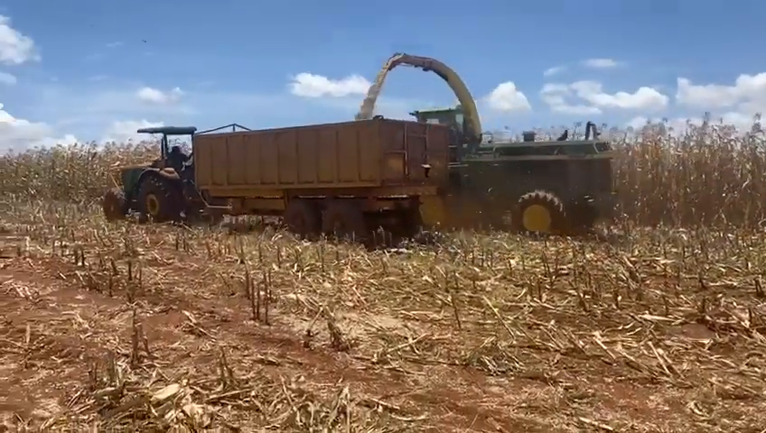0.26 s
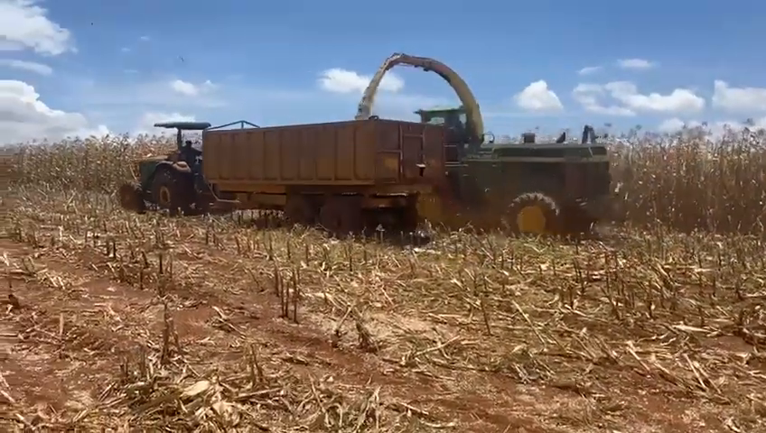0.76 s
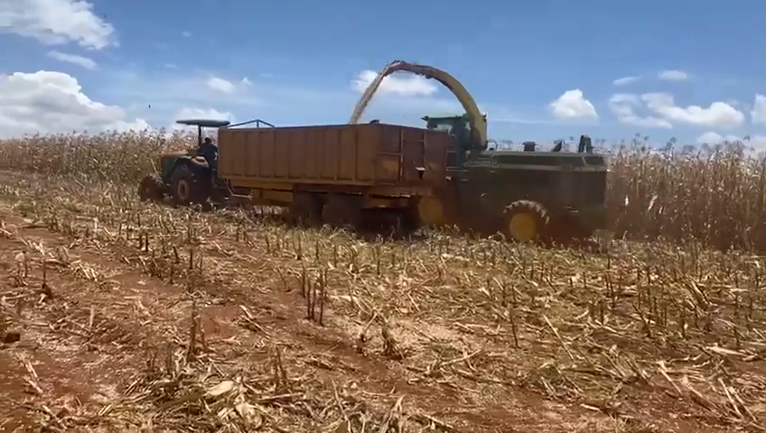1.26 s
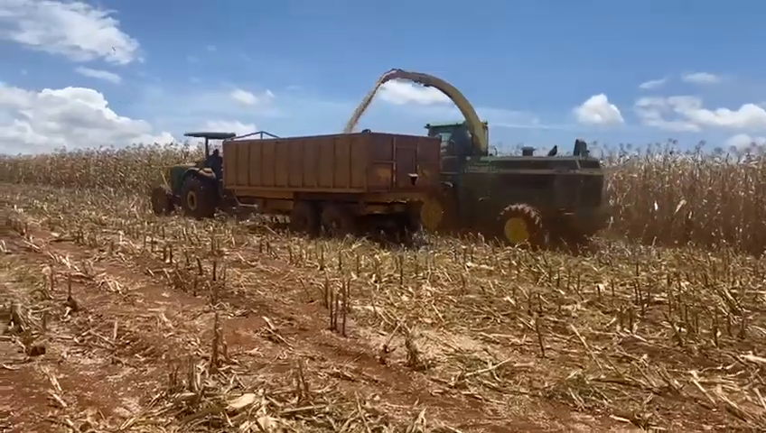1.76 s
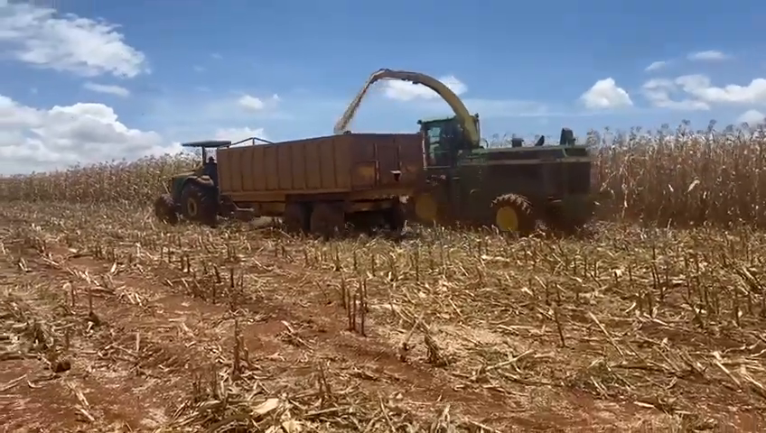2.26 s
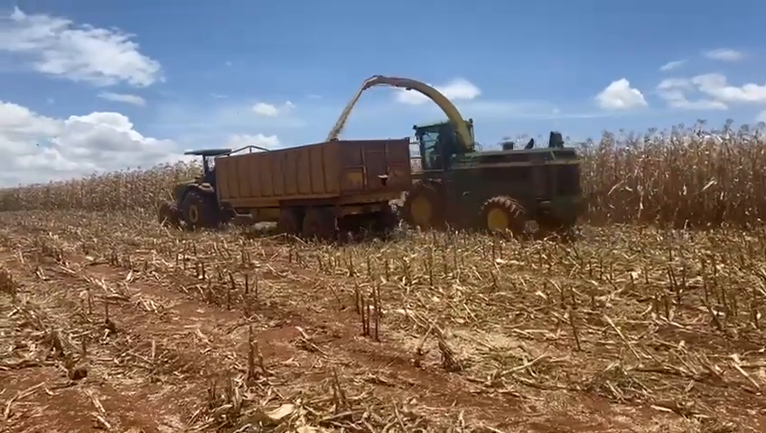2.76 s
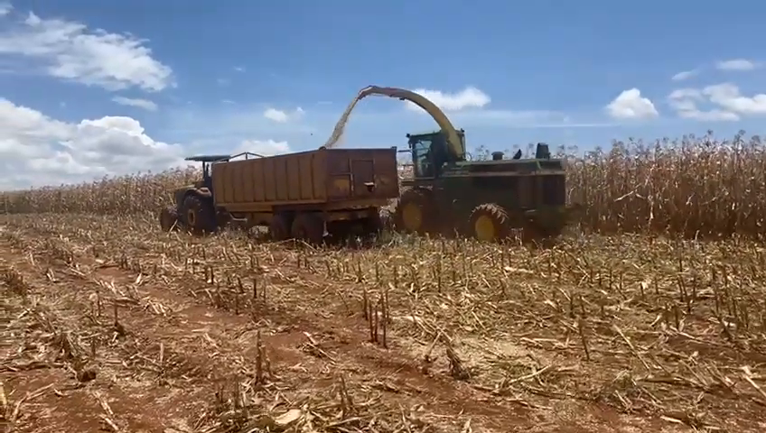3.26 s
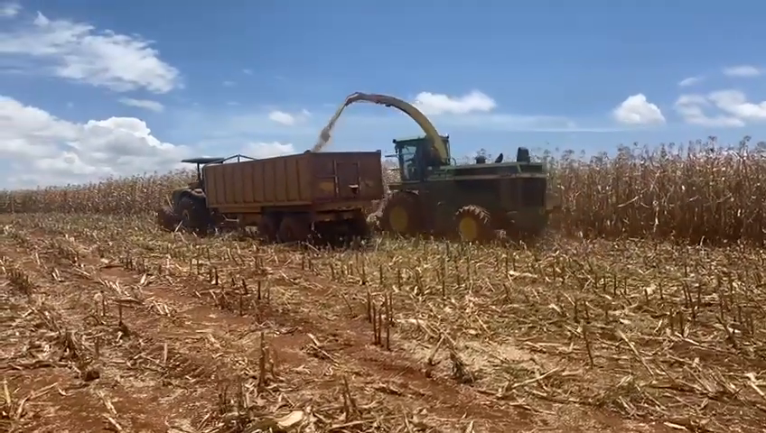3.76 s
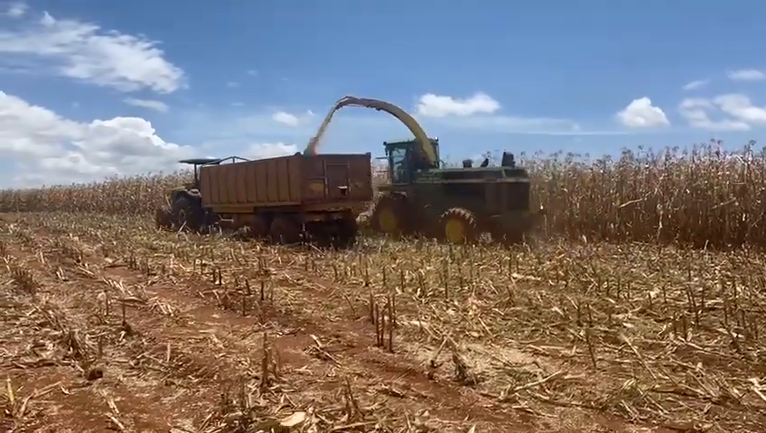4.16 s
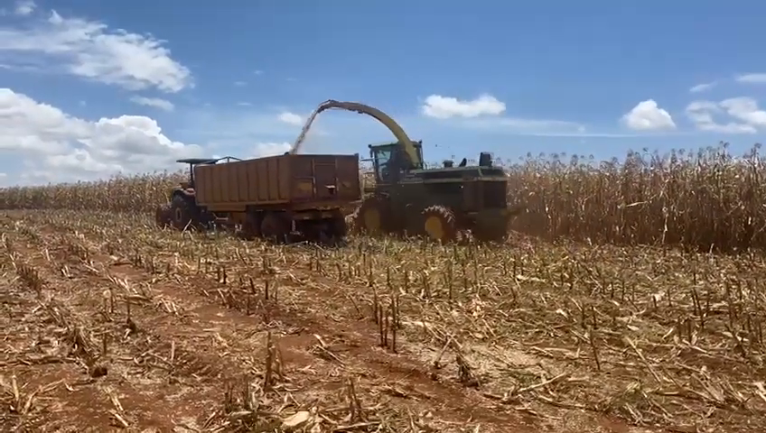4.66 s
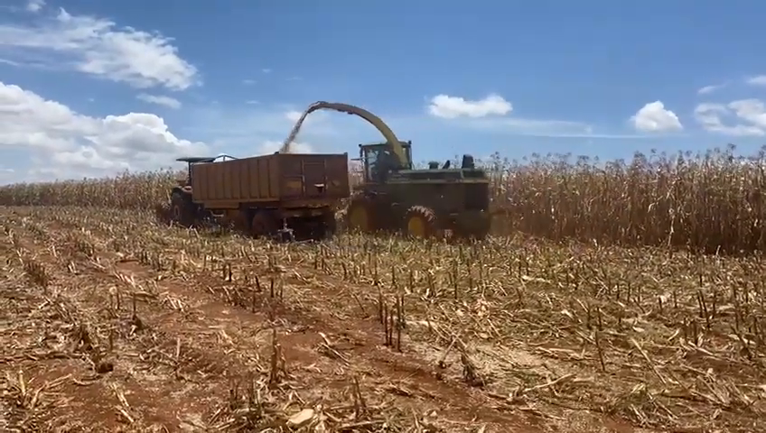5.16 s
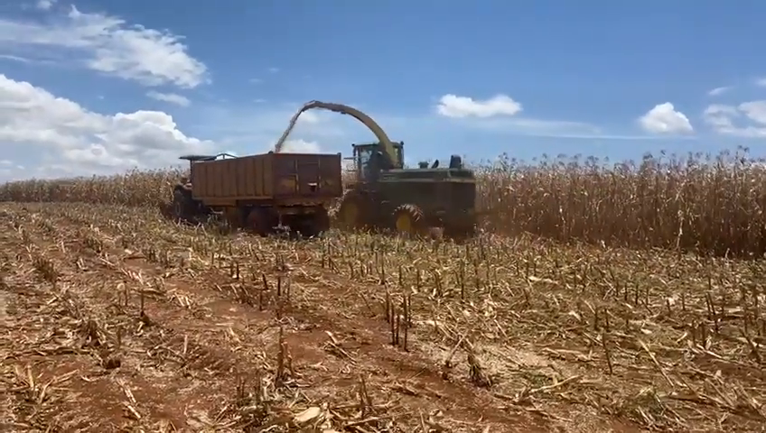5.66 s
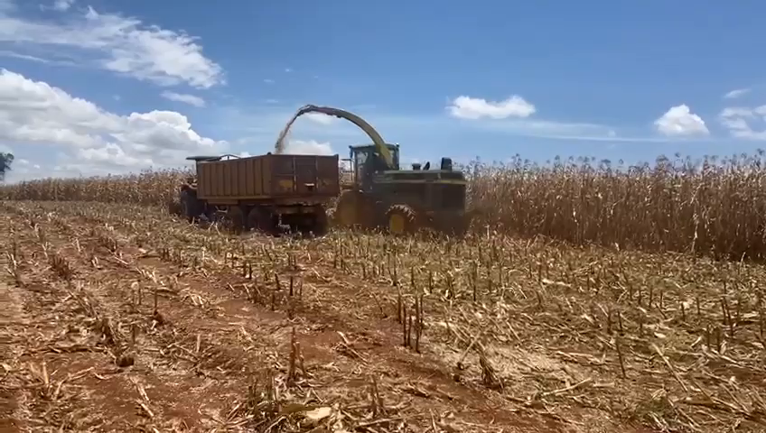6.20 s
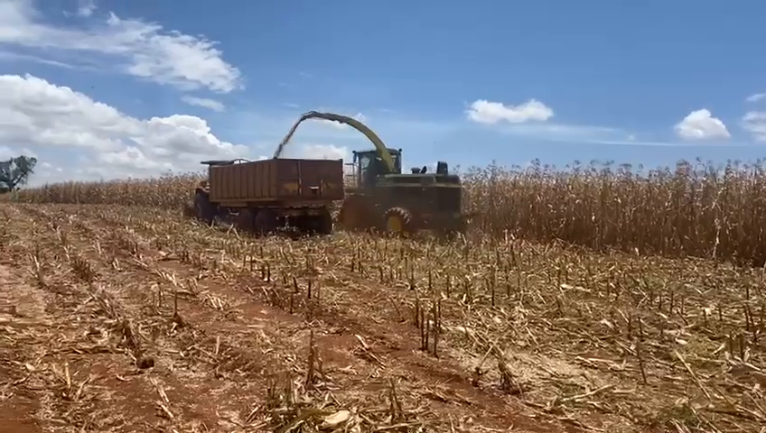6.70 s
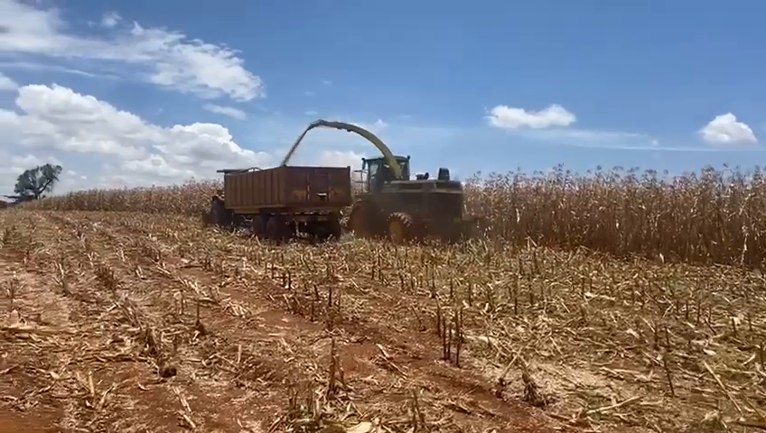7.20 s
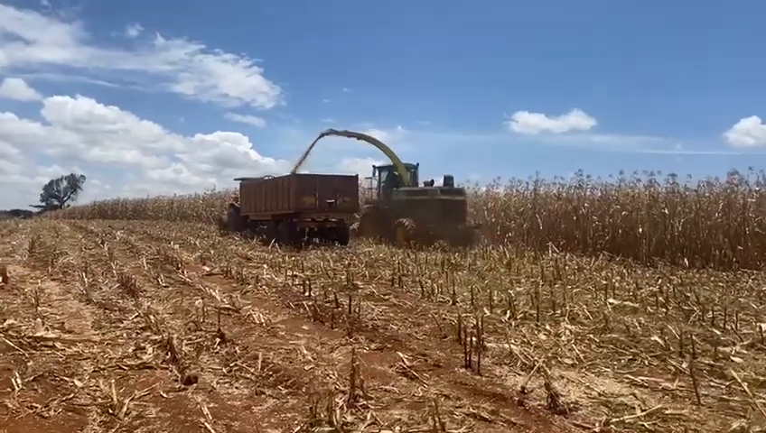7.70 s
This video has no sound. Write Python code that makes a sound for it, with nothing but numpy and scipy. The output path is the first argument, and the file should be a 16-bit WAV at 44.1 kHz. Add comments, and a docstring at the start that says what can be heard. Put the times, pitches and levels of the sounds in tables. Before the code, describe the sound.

A harvester and tractor drone loudly and evenly in an open field, with rattling machinery and chopped maize rushing through a metal spout.

```python
"""Forage harvester in a field

A harvester chops maize beside a tractor and trailer, moving slowly away. Periodic sources give tones:
the six-cylinder diesel drones, the cutterhead sings, the belt drives hum. Random impacts give noise:
chopped crop rushes up the spout in throbs and surges and excites the modes of its sheet steel.
A hand-held phone hears the scene, with a ground echo of crop and clatter and a few puffs of wind."""
import sys
import numpy as np
from scipy import signal
from scipy.fft import rfft, irfft
from scipy.io import wavfile

SR = 44100
rng = np.random.default_rng(int(sys.argv[2]) if len(sys.argv) > 2 else 0)


def int16_out(signal):
    """Quantize to a 16-bit WAV file."""
    q = np.round(np.clip(np.atleast_2d(signal).T, -1, 1) * 32767)
    wavfile.write(sys.argv[1], SR, q.astype(np.int16))


N = 350154
TIME = np.arange(N) / SR
BIN_HZ = np.arange(N // 2 + 1) * SR / N
TURN_S, TURN_TIME_S = 1.27, 0.95  # swing from side-on to tail-on: midpoint, time constant


def diesel(cycles):
    """Harmonic series: six firings a cycle, with unequal cylinders filling in the other orders."""
    # engine harmonics (multiple of the engine cycle, rms level [dB])
    harmonics = [(2, -46), (3, -42), (4, -46), (6, -35.5), (7, -40), (9, -31.5), (10, -34), (13, -33),
                 (14, -41), (15, -41), (16, -34.5), (18, -48), (22, -45), (24, -48), (25, -44), (26, -47),
                 (27, -47), (28, -50), (29, -47)]
    drone = sum(undb(db) * tone(cycles, order, flutter_db=1.1, wobble_rad=0.45)
                for order, db in harmonics)
    # the exhaust booms at twice the firing rate; it comes round to face the phone and fades once
    boom_db = -32.5 + 5.3 * turned(4.4, 0.3) - 13 * swell(3.34, 0.45)
    return drone + undb(boom_db) * tone(cycles, order=12, flutter_db=1.43, wobble_rad=0.086)


def cutterhead(cycles):
    """Blade-passing tone: knives cross the shear bar; the tone dwindles as the machine draws away."""
    # the octave beams toward the phone (time [s], half-width [s], rise [dB])
    beams = [(1.35, 1, 12), (7.9, 1, 12.5)]
    knife_db = -27 + interference(loudest_s=0.8, period_s=4.25, reflection=0.38) - 9 * swell(8.1, 1.04)
    octave_db = -45.5 + sum(db * swell(s, width) for s, width, db in beams)
    knife = undb(knife_db) * tone(cycles, order=17.5, flutter_db=1.0, wobble_rad=0.051)
    octave = undb(octave_db) * tone(cycles, order=35, flutter_db=2.5, wobble_rad=0.3)
    return knife + octave


def drives(cycles):
    """Non-integer drive ratios: shafts and belts hum between the engine's harmonics."""
    # geared and belted shafts (multiple of the engine cycle, relative level [dB])
    shaft_orders = [(3.28, -36), (4.37, -41.5), (6.56, -46), (6.83, -38), (9.56, -34.5), (10.93, -41.5),
                    (19.12, -41.5), (28.7, -41.5), (47.9, -47), (52.5, -48)]
    shafts = sum(undb(db + 0.7) * tone(cycles, order, flutter_db=3.5, wobble_rad=0.65)
                 for order, db in shaft_orders)
    belt_db = -36.5 + interference(loudest_s=0.96, period_s=12.3, reflection=0.92)
    return shafts + undb(belt_db) * tone(cycles, order=20.52, flutter_db=1.5, wobble_rad=0.23)


def exhaust_rumble():
    """Low-frequency noise: the exhaust rumbles at a steady level."""
    # rumble spectrum (frequency [Hz], relative density [dB])
    spectrum = [(15, -26), (28, -17), (42, -10), (60, -4), (95, 4.5), (140, 3), (200, -4.5), (300, -15),
                (600, -39)]
    return undb(-29.5) * coloured(gain_curve(spectrum))


def fan_roar(cycle_hz, firings, surge_db):
    """Load-dependent noise: fans and panels roar louder as the engine labours and slows."""
    # roar spectrum (frequency [Hz], relative density [dB])
    spectrum = [(100, -9), (190, -4), (270, 2.5), (350, 0), (420, -0.5), (520, -6.5), (640, -13.5),
                (900, -13), (2000, -69)]
    light_load_hz, db_per_sag_hz = 18.4, 8
    effort_db = db_per_sag_hz * (light_load_hz - cycle_hz) + surge_db
    level_db = -24.5 - 5 * turned(TURN_S, TURN_TIME_S) + effort_db
    return undb(level_db) * coloured(gain_curve(spectrum)) * (1 + 0.067 * firings)


def clatter(cycles, firings, feed_db):
    """Amplitude modulation: the machinery's impacts pulse with each firing and each engine cycle."""
    # clatter spectrum (frequency [Hz], relative density [dB])
    spectrum = [(350, -4), (600, 2), (800, 0), (1000, 0), (1250, -1.5), (1500, -8), (1720, -10.5),
                (1950, -8.5), (2500, -14.5), (3300, -37), (6000, -60)]
    level_db = -29 + 2.5 * turned(TURN_S, TURN_TIME_S) + feed_db
    pulsing = 1 + 0.03 * firings + 0.073 * throb(cycles, sharpness=2.1)
    return undb(level_db) * coloured(gain_curve(spectrum), scatter_db=1.5) * pulsing


def crop_stream(cycles, crunch_gain, chaff_db, thin_db):
    """Superposed impacts: chopped maize pelts the spout in throbs and hisses into the trailer."""
    # spectra of rushing crop, chaff and dry stalks (frequency [Hz], relative density [dB])
    rush_spectrum = [(1200, -7), (2000, -6), (2900, 2), (3400, -2), (3900, 1.5), (4500, -2.5), (5300, -5.5),
                     (6500, -11), (9000, -36)]
    hiss_spectrum = [(3500, -22), (5000, -7), (6200, -1), (7300, 0), (8100, -1.5), (9000, -2), (9700, -5),
                     (10200, -10), (11300, -10), (12000, -15)]
    crunch_spectrum = [(700, -14), (1300, -5), (2200, 10), (2700, 0), (3300, 4), (4200, 4.5), (5200, 4),
                       (6700, 3.5), (7600, -1), (9000, -18), (12000, -8)]
    turn = turned(TURN_S, TURN_TIME_S)
    flow_db = thin_db + 0.55 * walk(6)
    rush_db = -36 + 1.2 * turn + flow_db
    hiss_db = -39 - 1.16 * turn + flow_db + chaff_db + 1.2 * walk(11)
    rush = undb(rush_db) * coloured(gain_curve(rush_spectrum), scatter_db=2.0)
    hiss = undb(hiss_db) * coloured(gain_curve(hiss_spectrum), scatter_db=2.6)
    crunch = crunch_gain * coloured(gain_curve(crunch_spectrum), scatter_db=4.0)
    lumps = undb(0.55 * walk(14))
    pulsing = 1 + 0.078 * throb(cycles, sharpness=0.96) + 0.043 * throb(3 * cycles, sharpness=1)
    return (rush + hiss + crunch) * lumps * pulsing


def uneven_feed():
    """Slow modulation: thick bunches crunch and shift the noise levels; thin places lower them."""
    # bunches of dry stalks (time [s], half-width [s], crunch level [dB],
    # roar change [dB], clatter change [dB], chaff hiss change [dB])
    bunches = [(1.35, .18, -50, 2, 0, -0.5), (1.688, 0.066, -36, -1, 1.5, 4.5),
               (2.082, 0.15, -42, 0, 1.5, 2.5), (2.65, 0.13, -37.5, 4, 1.3, 3.5),
               (4.482, 0.1, -42, 4, 1, 2.5), (5.018, .11, -37.5, 1, 0.5, 1.5),
               (5.57, 0.033, -35, -3, 1.5, 3), (5.8, 0.08, -58, -1, 2, -2),
               (6.678, 0.074, -30.5, 2.5, 2, 0), (6.755, 0.052, -30.5, 0.5, 0.5, 3),
               (6.897, 0.12, -33.5, 0.5, 2, -1), (7.085, 0.052, -30, -6, 1, 0),
               (7.23, 0.075, -32.5, -1, 0.5, -4), (7.66, 0.25, -33.5, -3.5, 0.2, -3)]
    # thin places in the row (time [s], half-width [s], level change [dB])
    gaps = [(1.859, 0.094, -1), (3.303, .2, -0.5), (3.946, 0.56, -1), (6.3, 0.15, -0.6)]
    crunch_gain = sum(undb(db) * swell(s, width) for s, width, db, *_ in bunches)
    surge_db, knock_db, chaff_db = sum(np.outer(changes_db, swell(s, width))
                                       for s, width, _, *changes_db in bunches)
    thin_db = sum(db * swell(s, width) for s, width, db in gaps)
    return crunch_gain, surge_db, knock_db, chaff_db, thin_db


def sheet_metal(cycles):
    """Directional radiation: the spout and each panel ring loudest while they face the phone."""
    # panel modes (frequency [Hz], half-width [Hz], level [dB], facing time [s], half-width [s])
    modes = [(1670, 1000, -34, 0.26, 1), (2460, 67, -39, 1.3, 0.55), (3800, 130, -51, 1, 0.3),
             (2680, 32, -42.5, 2.8, 1), (1093, 60, -32, 2.8, 0.4), (3580, 300, -39.5, 5.42, 0.95),
             (2000, 140, -43.5, 7.2, 0.69), (490, 64, -27.5, 7.07, 0.73), (2288, 47, -32.5, 1.68, 0.16),
             (2237, 56, -36.5, 3.45, 0.34)]
    spout = undb(-39) * swell(2.7, 3.2) * resonance(centre_hz=2266, half_width_hz=71)
    panels = sum(undb(db) * swell(s, width_s) * resonance(hz, width_hz)
                 for hz, width_hz, db, s, width_s in modes)
    return panels + spout * (1 + 0.18 * throb(cycles, sharpness=0.96))


def resonance(centre_hz, half_width_hz):
    """Forced vibration: a stream of impacts keeps one sheet-metal mode ringing."""
    return coloured(1 / (1 + ((BIN_HZ - centre_hz) / half_width_hz) ** 2))


def hollow_steel(x, t60_s=0.057, share=0.3):
    """Reverberation: spout and trailer box ring briefly; the prominent modes shift as they move."""
    t = np.arange(SR // 5) / SR
    responses = rng.standard_normal((2, len(t))) * np.exp(-np.log(1000) * t / t60_s)
    one, other = (signal.fftconvolve(x, r[None] / np.linalg.norm(r), axes=1)[:, :N] for r in responses)
    angle = 1.7 * TIME
    ringing = np.cos(angle) * one + np.sin(angle) * other
    return (x + share * ringing) / np.hypot(1, share)


def ground_echo(x):
    """Comb filtering: the soil returns a later, duller copy, and the notches move with the phone."""
    # ground reflection (time [s], lag [ms], amplitude relative to the direct sound)
    reflection = [(0, 0.66, 0.2), (.5, 0.55, 0.26), (1, 0.52, 0.17), (1.3, 0.57, 0.17), (1.7, 0.61, 0.091),
                  (4, 0.64, 0.15), (7.9, 0.57, 0.13)]
    lag_ms, share = curves(reflection)
    dulled = irfft(rfft(x) * gain_curve([(3300, 0), (5000, -6), (9000, -18)]), N)
    echo = np.array([np.interp(TIME - lag_ms / 1000, TIME, channel) for channel in dulled])
    return (x + share * echo) / np.hypot(1, share)


def wind():
    """Turbulent pressure: short puffs buffet the microphone."""
    # puffs (time [s], half-width [s], relative level [dB])
    puffs = [(2.33, 0.086, -27), (7.02, 0.093, -22.5), (7.22, 0.12, -21), (7.636, 0.031, -18.5),
             (7.85, .1, -26)]
    gust = sum(undb(db - 1) * swell(s, width) for s, width, db in puffs)
    return gust * coloured(gain_curve([(15, -22), (30, -6), (48, 11), (90, 8), (160, 8), (400, -43)]))


def tone(cycles, order, flutter_db, wobble_rad):
    """Scintillation: moving air flutters the level and phase of a sinusoid locked to the engine."""
    phase = 2 * np.pi * (order * cycles + rng.random()) + wobble_rad * walk(6.1)
    return np.sqrt(2) * np.sin(phase) * undb(flutter_db * walk(3.1))


def interference(loudest_s, period_s, reflection):
    """Two-path interference: gain [dB] as direct and reflected waves drift in and out of step."""
    angle = 2 * np.pi * (TIME - loudest_s) / period_s
    return 20 * np.log10(np.abs(1 + reflection * np.exp(1j * angle)))


def coloured(gain, scatter_db=0):
    """Partial coherence: impacts shaped by a spectrum differ somewhat at the two microphone ports."""
    # diffuse sound (frequency [Hz], side level relative to mid [dB])
    spread = [(40, -13), (100, -14), (150, -17), (300, -20), (600, -16), (1100, -9.5), (1600, -4),
              (2500, -6), (3300, -9), (4200, -11), (5600, -6), (7000, -24), (8100, -13), (9000, -26)]
    mid = irfft(rfft(impacts(scatter_db)) * gain, N)
    side = irfft(rfft(impacts(scatter_db)) * gain * gain_curve(spread), N)
    return np.array([mid + side, mid - side]) / np.std(mid)


def impacts(scatter_db):
    """Dense impacts of scattered size; with no scatter they merge into Gaussian noise."""
    return unit_rms(rng.standard_normal(N) * undb(scatter_db * np.minimum(rng.exponential(size=N), 7)))


def throb(cycles, sharpness):
    """Periodic modulator: one rounded pulse a cycle, with mean 0 and rms 1."""
    pulse = np.exp(sharpness * np.cos(2 * np.pi * cycles))
    return unit_rms(pulse - pulse.mean())


def walk(rate_hz):
    """Low-pass noise: a smooth random wander with rms 1."""
    return unit_rms(irfft(rfft(rng.standard_normal(N)) * np.exp(-(BIN_HZ / rate_hz) ** 2), N))


def swell(centre_s, half_width_s):
    """Gaussian envelope: a smooth rise and fall around one moment."""
    return np.exp(-((TIME - centre_s) / half_width_s) ** 2)


def turned(centre_s, time_constant_s):
    """Sigmoid step from 0 to 1 as the machine turns past a bearing."""
    return 0.5 + 0.5 * np.tanh((TIME - centre_s) / time_constant_s)


def curves(table):
    """Linear interpolation of a table's columns over time."""
    s, *columns = np.transpose(table)
    return [np.interp(TIME, s, column) for column in columns]


def over_hz(points):
    """Interpolation of (frequency [Hz], value) points along a logarithmic frequency axis."""
    hz, value = np.transpose(points)
    return np.interp(np.log(BIN_HZ + 1), np.log(hz), value)


def gain_curve(points):
    """Amplitude response through (frequency [Hz], level [dB]) points."""
    return undb(over_hz(points))


def undb(db):
    return 10 ** (np.asarray(db) / 20)


def unit_rms(x):
    return x / np.sqrt(np.mean(x ** 2))


def scene():
    """Superposition: one engine speed paces every tone and throb; noise and wind add to them."""
    # engine speed, sagging when thick crop goes in (time [s], cycle rate [Hz])
    speed = [(0, 18.33), (.4, 18.3), (.85, 18.02), (1.25, 18.03), (1.7, 18.13), (2.6, 18.13), (4.3, 18.36),
             (6, 18.39), (6.7, 18.06), (7.9, 18.05)]
    cycle_hz, = curves(speed)
    cycles = np.cumsum(cycle_hz) / SR
    firings = throb(6 * cycles, sharpness=1.2)
    crunch_gain, surge_db, knock_db, chaff_db, thin_db = uneven_feed()
    drone = diesel(cycles) + cutterhead(cycles) + drives(cycles)
    body = exhaust_rumble() + fan_roar(cycle_hz, firings, surge_db)
    knocks = clatter(cycles, firings, knock_db + thin_db)
    crop = crop_stream(cycles, crunch_gain, chaff_db, thin_db) + sheet_metal(cycles)
    return drone + body + ground_echo(hollow_steel(knocks + crop)) + wind()


def record(dry, cutoff_hz=11650):
    """Diffraction and band limiting: the ports differ in level and phase; the phone cuts the top."""
    # the top treble wraps round the phone's body (frequency [Hz], phase lead of the left port [rad])
    port_phase = [(950, 0), (1500, -.8), (1900, 0), (2400, -.3), (3000, 0), (5500, .2), (6300, 0),
                  (7600, 0), (8500, 3.05), (9600, 3.25), (10400, 6.28)]
    # port imbalance (frequency [Hz], left minus right level [dB])
    imbalance = [(100, 0), (300, -.5), (700, .3), (1000, -.8), (1600, 2.3), (2400, 2), (4000, 1), (7000, 0)]
    half_db = over_hz(imbalance) / 2
    ports = np.array([undb(half_db) * np.exp(1j * over_hz(port_phase)), undb(-half_db)])
    heard = irfft(rfft(dry) * ports, N)
    return signal.sosfilt(signal.ellip(10, 0.2, 80, cutoff_hz, fs=SR, output="sos"), heard)


dry = scene()
out = record(dry)
int16_out(out)
```